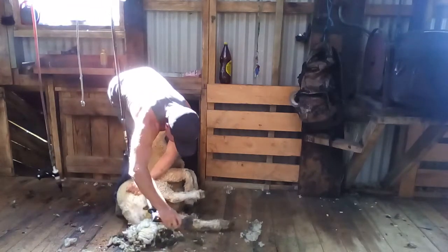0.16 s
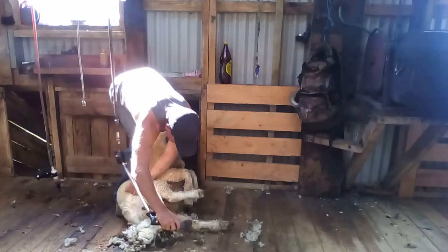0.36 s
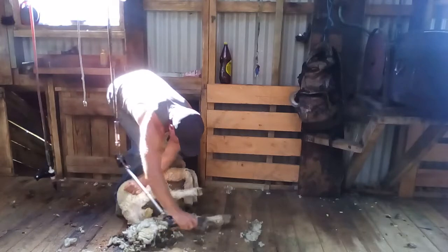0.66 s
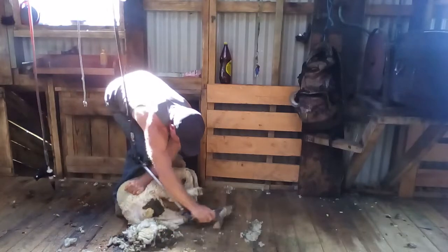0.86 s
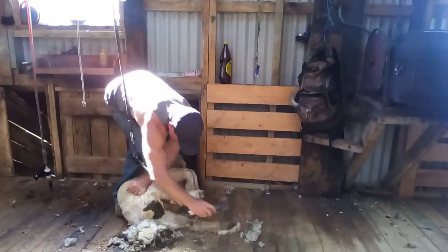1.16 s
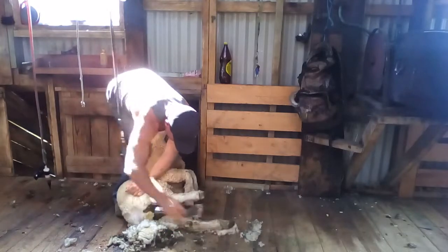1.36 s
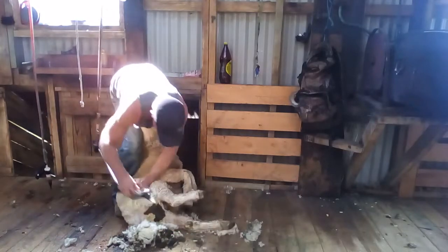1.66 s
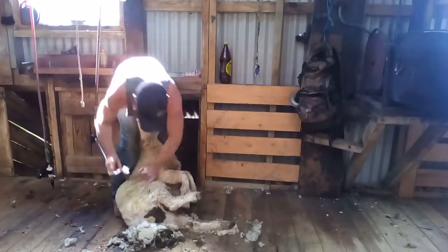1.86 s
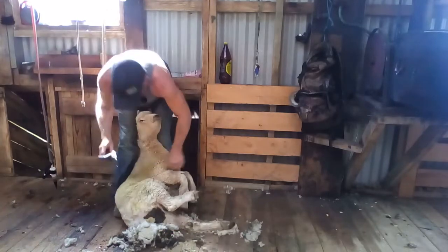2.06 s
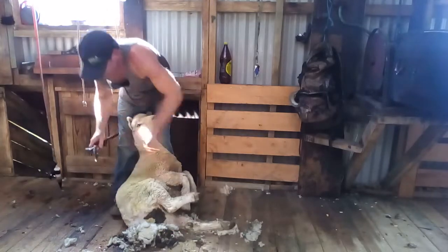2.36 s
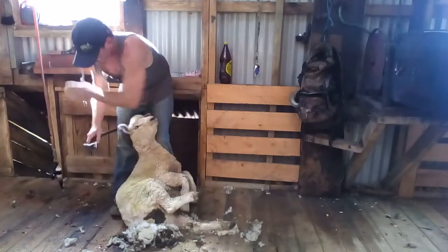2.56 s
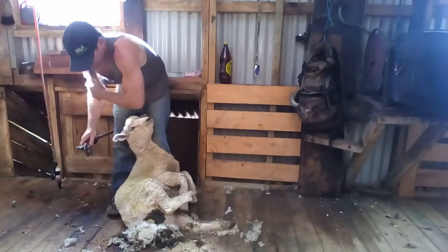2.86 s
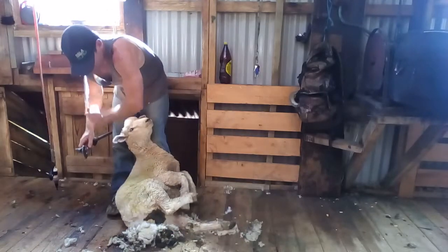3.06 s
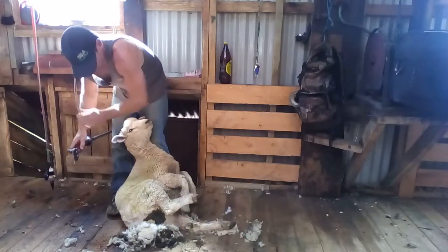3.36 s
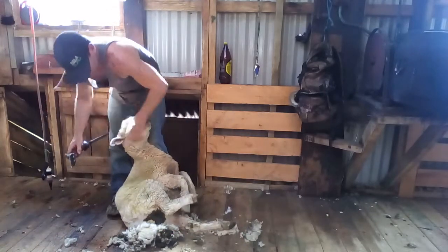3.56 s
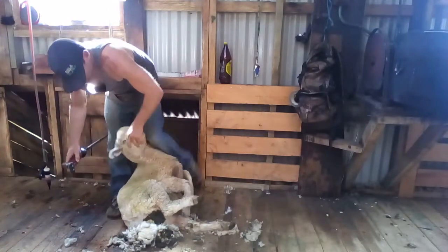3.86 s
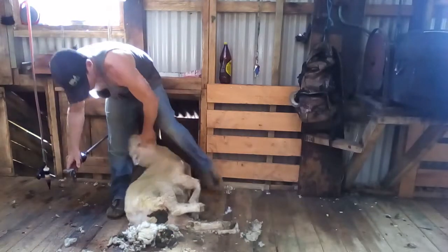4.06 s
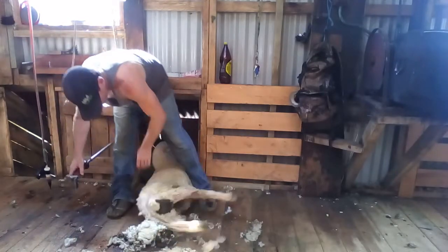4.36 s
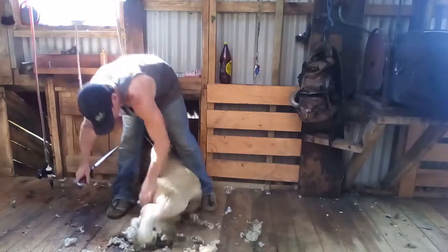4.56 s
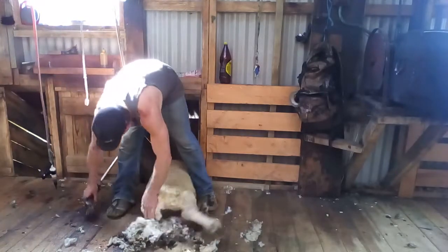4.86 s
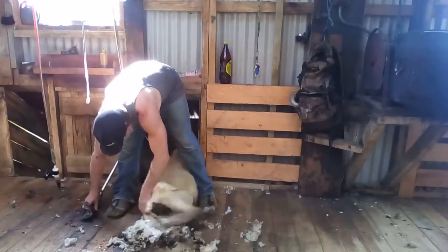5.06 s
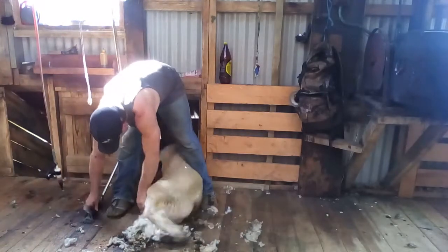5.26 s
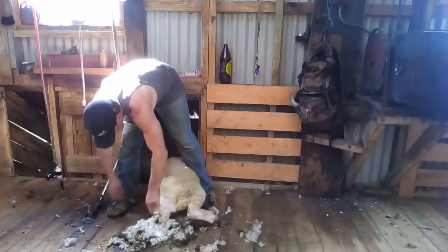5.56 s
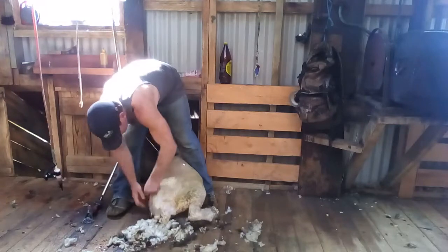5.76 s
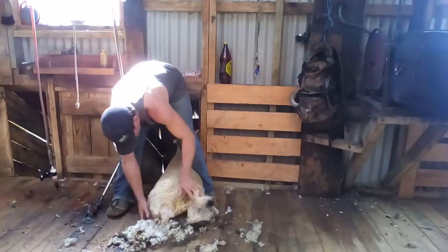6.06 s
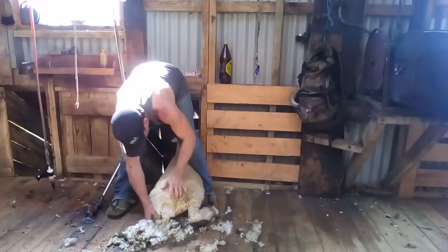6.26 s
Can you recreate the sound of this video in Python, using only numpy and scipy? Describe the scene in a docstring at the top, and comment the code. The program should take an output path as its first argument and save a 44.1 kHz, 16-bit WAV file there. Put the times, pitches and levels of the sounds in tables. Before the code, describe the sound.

Loud continuous buzzing of electric sheep shears, slightly wavering and freer once lifted from the wool, ends abruptly with a hard mechanical clack and rattling rebounds; another clack follows shortly. Only a quiet overhead motor whirr continues, towards the left. Later come brief rubbing slides, hollow knocks on floorboards, a tiny metal clink and soft tumbling thuds, with short shed reverberation around a fixed stereo microphone at moderate distance.

```python
"""Shearing handpiece in a wooden shed

A shaft-driven handpiece trims a sheep: shaft harmonics hum, steel grinds in stereo noise and a wall rattles.
A pull on the cord throws the drive out with a clunk of decaying modes; the lever clacks back, bouncing.
The overhead motor, noise and wavering tones, whirrs throughout. Wool and leather then slide by stick and slip,
a boot knocks on the floorboards, exciting their modes, the handpiece is laid down and the sheep is rolled over.
"""
import sys
import numpy as np
from scipy import signal
from scipy.fft import rfft, irfft, next_fast_len
from scipy.io import wavfile

SR = 44100
rng = np.random.default_rng(int(sys.argv[2]) if len(sys.argv) > 2 else 0)


def put_to_file(sound):
    """Save the sound as 16-bit audio at rate SR, in the file named by the first command-line argument."""
    columns = np.atleast_2d(sound).T  # one column per channel
    safe = np.clip(columns, -1, 1)
    whole_steps = np.round(safe * 32767)
    wavfile.write(sys.argv[1], SR, whole_steps.astype(np.int16))


N = 282681
TIME = np.arange(N) / SR   # s


def from_db(db):
    """Logarithmic level: decibels become an amplitude ratio."""
    return 10 ** (np.asarray(db) / 20)


def rms_one(x):
    """Normalisation: scale to an rms of 1."""
    return x / np.sqrt(np.mean(x ** 2) + 1e-20)


def in_time(rows):
    """Linear interpolation: the columns of a time course at every sample."""
    s, *columns = np.transpose(rows)
    return [np.interp(TIME, s, c) for c in columns]


def at_hz(points, hz):
    """Interpolation of a table on a log-frequency axis."""
    f, value = np.transpose(points)
    return np.interp(np.log(hz + 1), np.log(f), value)


def bins(size):
    """Discrete Fourier transform: its bin frequencies in Hz."""
    return np.fft.rfftfreq(size, 1 / SR)


def drift(rate_hz):
    """Low-pass noise: a smooth random course of rms 1, with a double pole at the given rate."""
    step = 40   # samples between computed points
    r = np.exp(-2 * np.pi * rate_hz * step / SR)
    noise = rng.standard_normal(N // step + 2002)
    slow = signal.lfilter([1], [1, -2 * r, r * r], noise)[2000:]   # the settling is dropped
    return np.interp(np.arange(N) / step, np.arange(len(slow)), rms_one(slow))


def colour(x, spectrum):
    """Minimum-phase filtering: the folded cepstrum of a dB curve gives a causal response."""
    size = 2 * next_fast_len(x.shape[-1] // 2 + SR // 10)
    cepstrum = irfft(np.log(from_db(at_hz(spectrum, bins(size)))))
    cepstrum[1:size // 2] *= 2
    cepstrum[size // 2 + 1:] = 0
    response = np.exp(rfft(cepstrum))
    return irfft(rfft(x, size) * response)[..., :x.shape[-1]]


# correlation of the two channels: f/Hz, likeness/0-1
CHANNEL_LIKENESS = [(250, 0.89), (500, 0.66), (1000, 0.31), (2000, 0), (12000, 0.03)]


def diffuse(size):
    """Diffuse field: stereo white noise, alike in the bass and nearly unrelated in the treble."""
    padded = 2 * next_fast_len(size // 2 + 1)
    mid, side = rfft(rng.standard_normal((2, padded)))
    alike = np.clip(at_hz(CHANNEL_LIKENESS, bins(padded)), 0, 1)
    common = np.sqrt((1 + alike) / 2) * mid
    opposed = np.sqrt((1 - alike) / 2) * side * [[1], [-1]]
    return irfft(common + opposed)[:, :size]


# reverberation time of the shed: f/Hz, t60/s
SHED_T60 = [(100, 0.85), (500, 0.64), (1500, 0.51), (5000, 0.79), (12000, 0.09)]


def shed(x, wet_db, build_s):
    """Reverberation: direct sound, earlier on the left, plus reflections that build up and die band by band."""
    t, centres = TIME[:SR], np.geomspace(60, 15000, num=9)
    noise, tail = rfft(diffuse(SR)), 0
    for hz, own in zip(centres, np.eye(len(centres))):
        band = irfft(noise * at_hz(np.c_[centres, own], bins(SR)), SR)
        tail = tail + band * from_db(-60 * t / at_hz(SHED_T60, hz))
    tail = rms_one(tail * (1 - np.exp(-t / build_s))) / np.sqrt(SR)
    direct = np.array([x, np.roll(x, 3)])
    reflections = signal.fftconvolve(x[None], tail, axes=1)[:, :N]
    return direct + from_db(wet_db) * reflections


def ringing(modes, scatter_db):
    """Modal superposition: one blow gives every mode a strength and sign of its own."""
    hz, db, t60 = np.transpose(modes)[:, :, None]
    t = TIME[:SR // 2]
    strength = from_db(db + scatter_db * rng.standard_normal(hz.shape)) * rng.choice([-1, 1], hz.shape)
    return np.sum(strength * from_db(-60 * t / t60) * np.sin(2 * np.pi * hz * t), axis=0)


def crunch(spectrum, decay_s, spread=0.94):
    """Impulsive contact: one sharp push, then coloured noise for dense, quickly damped modes."""
    t = TIME[:SR // 2]
    force = spread * rng.standard_normal(len(t)) * np.exp(-t / decay_s)
    force[0] += np.sqrt(SR * decay_s) / 2
    return colour(force, spectrum)


def add(track, s, db, cut_hz, sound, order=2):
    """Contact stiffness: lay a blow on a track; a softer contact has a lower cut-off."""
    low_pass = signal.butter(order, min(cut_hz, SR / 3), fs=SR, output="sos")
    soft = signal.sosfilt(low_pass, sound)
    start = int(s * SR)
    track[start:start + len(soft)] += from_db(db) * soft[:N - start]


def grains(spread_db):
    """Shot noise: countless tiny snaps of uneven size, rms 1."""
    size_db = spread_db * np.minimum(rng.exponential(1, N), 5)
    return rms_one(rng.standard_normal(N) * from_db(size_db))


MOVE_ATTACK_S, MOVE_RELEASE_S = 0.014, 0.017


def push(s, length_s):
    """Exponential envelope: one movement of the body swells, holds and dies away."""
    before = np.maximum(s - TIME, 0)
    after = np.maximum(TIME - s - length_s, 0)
    return np.exp(-before / MOVE_ATTACK_S - after / MOVE_RELEASE_S)


STOP_S = 3.135   # the drive is thrown out


def running(fade_s):
    """Exponential decay: 1 while the drive is engaged, then dying away."""
    return np.exp(-np.maximum(TIME - STOP_S, 0) / fade_s)


LIFT_S, LIFT_TAKES_S = 2.033, 0.27


def lifted():
    """Release of load: 0 while the comb is in the wool, rising to 1 once the handpiece hangs free."""
    return np.clip((TIME - LIFT_S) / LIFT_TAKES_S, 0, 1)


# the shaft runs at a nearly constant speed; slack, it speeds up a little
TURNS_PER_S, SPEED_WANDER_PER_S, FREE_GAIN_TURNS_PER_S = 60.3, .07, .15


def shaft_turns(free):
    """Phase as the integral of speed: turns of the drive shaft since the start."""
    speed = TURNS_PER_S + FREE_GAIN_TURNS_PER_S * free + SPEED_WANDER_PER_S * drift(1.09)
    return np.cumsum(speed) / SR


# main hum, the seventh shaft order: t/s, level/dB
HUM_LEVEL = [(0.04, -19), (0.12, -17.5), (0.35, -21.5), (0.62, -17.5), (1.0, -18.5), (1.1, -22.5),
             (1.18, -18), (1.53, -21), (2.06, -14), (2.17, -21), (2.51, -23.5), (2.54, -16.5), (2.82, -34),
             (2.86, -25), (3.03, -23.5), (3.11, -19.5)]
HUM_ORDER = 7
# how far the arm stretches the jointed drive tube: t/s, reach/0-1
TUBE_REACH = [(.48, 0), (.7, 1), (.98, 0.82), (1.15, 0.48), (1.5, 0), (1.9, 0.6), (2.3, 0.22)]
# other orders: multiple, level while cutting/dB, change at full reach/dB, change when hanging free/dB
OTHER_ORDERS = [(1, -41.5, -0.5, -5), (2, -31.5, -8.5, 2), (3, -33, -10, 2), (4, -26.5, 2.5, -2.5),
                (5, -36.5, -6.5, 0.5), (6, -43, 10, -10), (8, -33.5, -0.5, -3.5), (9, -49, -8, 17.5),
                (10, -40.5, 6, 2), (11, -32, -9, -4.5), (13, -48, -4, 6), (14, -40.5, -11, 5.5),
                (15, -50.5, 15, 4), (17, -47.5, -2, 0), (20, -49, 0, -10), (27, -48, 0, -2)]
# depth (0-1) of the main hum's slow waver and quick flutter; the slack shaft swings more
SWING_CUTTING, SWING_FREE = 0.031, 0.31
SHAKE_CUTTING, SHAKE_FREE = 0.084, 0.22


def shaft_tone(turns, multiple, db, depth, flutter):
    """Modulated harmonic: one multiple of the shaft speed, wavering in level and phase."""
    wobble = (1 + depth * (drift(1.9) + 1j * drift(2.2))) / np.sqrt(1 + 2 * depth ** 2)
    wobble = wobble + flutter * (drift(29) + 1j * drift(17))
    carrier = np.exp(2j * np.pi * (multiple * turns + rng.random()))
    return np.sqrt(2) * from_db(db) * np.real(wobble * carrier)


def drive_hum(turns, weak_waver=0.13, weak_flutter=0.037):
    """Harmonic series of a rotating shaft: orders waver as the tube swings and rebalance as it stretches."""
    free, reach = lifted(), in_time(TUBE_REACH)[0]
    swing = SWING_CUTTING + (SWING_FREE - SWING_CUTTING) * free
    shake = SHAKE_CUTTING + (SHAKE_FREE - SHAKE_CUTTING) * free
    hum = shaft_tone(turns, HUM_ORDER, in_time(HUM_LEVEL)[0], swing, shake)
    for multiple, db, reach_db, free_db in OTHER_ORDERS:
        level_db = db + reach_db * reach + free_db * free
        hum = hum + shaft_tone(turns, round(multiple), level_db, weak_waver, weak_flutter)
    return hum * running(0.0021) * from_db([[-.4], [.4]])


def steel_ring(friction, course, width_hz, shimmer_db):
    """Resonance under friction: a steel part rings unevenly, at a slowly gliding pitch."""
    hz, ring_db = in_time(course)
    carrier = np.exp(2j * np.pi * np.cumsum(hz) / SR)
    r = np.exp(-np.pi * width_hz / SR)
    drive = friction * from_db(ring_db + shimmer_db * drift(104))
    return np.real(carrier * signal.lfilter([1 - r], [1, -r], drive / carrier))


# colour of the cutter: f/Hz, filter gain/dB
CUTTER_COLOUR = [(900, -10), (1300, -6.5), (1600, -4.5), (2050, -4.5), (2500, -2.5), (3700, -4),
                 (4800, -0.5), (5400, -3), (6200, -3.5), (7100, -10.5), (8300, -19.5), (12200, -42.5),
                 (12900, -15.5), (15200, -28)]
# left minus right of the cutter: f/Hz, difference/dB
CUTTER_BALANCE = [(1000, 2.5), (1700, -0.5), (2400, 5.5), (4300, 4.5), (4900, -0.5), (6100, -8), (7300, -9),
                  (8500, 2), (11000, 21.5), (13000, -0.5)]
# comb teeth catching: t/s, relative level/dB
TOOTH_SNAGS = [(.977, -39), (1.864, -28), (2.11, -26), (2.874, -18.5)]
# the fork rings higher as the comb is pushed out along the leg, and lower once free: t/s, f/Hz, ring/dB
FORK_RING = [(.1, 2480, -4), (.35, 2600, -8), (.55, 2800, -9), (.9, 2570, -10), (1.15, 2650, 2),
             (1.42, 2950, 2), (1.7, 2850, -11), (2.05, 2450, -22), (2.22, 2420, -5.5), (3.1, 2380, -13)]
# the comb's resonance shifts with the pressure on it: t/s, f/Hz, ring/dB
COMB_RING = [(.05, 4930, 6), (.25, 4850, -18), (.55, 4950, -5), (.8, 4950, 1), (1.0, 4750, -1),
             (1.25, 4880, 0), (1.5, 4750, -10), (1.65, 4640, -3), (2.15, 4440, 6.5), (2.3, 4750, 3),
             (2.7, 4850, -2), (3.1, 4900, -2)]
# the teeth ring where the wool leaves them bare: t/s, f/Hz, ring/dB
TEETH_RING = [(.05, 6100, 4.5), (.25, 6050, -25), (.68, 5900, 5), (1.0, 5900, -21), (1.22, 6100, 7),
              (1.45, 6100, -9), (2.2, 5870, 1), (2.5, 6000, -5), (3.1, 5900, -3)]
# the shearer eases off between strokes: t/s, length/s, change of the friction/dB
STROKE_EASES = [(0.213, 0.2, 0), (1.546, 0.42, -.5)]
FRICTION_DB, FRICTION_FREE_DB = -26, 0.2   # before wash, rings, colour and gain; louder with no wool to damp it
SLAP, SLAP_SHARPNESS, SLAP_LOPSIDED_DB = 1.5, 6, 2


def cutter(turns, uneven_db=2.5, bite_db=0.5, linger_s=0.016):
    """Dry friction: the cutter grinds over the comb and slaps at both stroke ends, harder at one; fibres snap."""
    stroke = (2 * turns).astype(int)   # two strokes a turn
    force = from_db(uneven_db * rng.standard_normal(N)[stroke] + SLAP_LOPSIDED_DB * (-1) ** stroke)
    slaps = force * np.exp(-SLAP_SHARPNESS * (2 * turns % 1))
    level_db = FRICTION_DB + FRICTION_FREE_DB * lifted()
    for s, length_s, change_db in STROKE_EASES:
        level_db = level_db + change_db * push(s, length_s)
    bite = from_db(level_db + bite_db * drift(9.7)) * running(0.0066)
    friction = rms_one(grains(spread_db=4.5) * (1 + SLAP * slaps)) * bite
    for s, db in TOOTH_SNAGS:
        add(friction, s, db, 14000, crunch([(1000, -26), (5000, -9.0), (14000, 14.0)], 0.0018))

    # the hand keeps moving, so the reflections blur into a wash that trails the cutter's power
    r = np.exp(-1 / (linger_s * SR))
    wash = diffuse(N) * np.sqrt(signal.lfilter([1 - r], [1, -r], friction ** 2))
    heard = np.array([friction, np.roll(friction, 3)]) + from_db(3.0) * wash
    rings = steel_ring(heard, FORK_RING, width_hz=420, shimmer_db=1.5)
    rings = rings + steel_ring(heard, COMB_RING, width_hz=300, shimmer_db=4.5)
    rings = rings + steel_ring(heard, TEETH_RING, width_hz=490, shimmer_db=3.0)

    left, right = colour(heard + rings, CUTTER_COLOUR)
    half_side = np.array(CUTTER_BALANCE) * [1, .5]   # each channel takes half the difference
    return from_db(5.0) * np.array([colour(left, half_side), colour(right, half_side * [1, -1])])


# colour of the rattling shaft and wall: f/Hz, filter gain/dB
RATTLE_COLOUR = [(25, -0.5), (40, -25), (85, -8.5), (135, -1.5), (156, 8.5), (175, -3.5), (215, 0),
                 (330, -1), (430, 7.5), (510, 0.5), (600, 0.5), (720, -4), (850, -1.5), (1100, -9),
                 (1600, -8.5), (2600, -29)]
RATTLE_CUTTING_DB, RATTLE_FREE_DB = -27, -25.5


def shaft_rattle(turns, throb=0.12, flutter_db=2.0):
    """Amplitude-modulated noise: loose joints in the drive tube shake the wall, harder once a turn."""
    level_db = RATTLE_CUTTING_DB + (RATTLE_FREE_DB - RATTLE_CUTTING_DB) * lifted()
    shake = (1 + throb * np.cos(2 * np.pi * turns)) * from_db(flutter_db * drift(32))
    return from_db(level_db) * rms_one(colour(diffuse(N) * shake, RATTLE_COLOUR)) * running(0.085)


# colour of the motor's whirr: f/Hz, filter gain/dB
WHIRR_COLOUR = [(25, -15), (42, -20), (62, -2.5), (150, -5.5), (260, -7), (410, -9.5), (590, -7),
                (1000, -13), (1900, -15), (3100, -14.5), (3800, -21), (6400, -21), (7800, -47.5),
                (13000, -55)]
# tones of the motor: f/Hz, level/dB
MOTOR_TONES = [(64.6, -58), (107.6, -64), (150.7, -61.5), (193.8, -55.5), (215.3, -57.5), (258.4, -54.5),
               (301.4, -60), (344.5, -57.5), (500.6, -56.5), (549.1, -59), (576, -54), (597.5, -57),
               (619.1, -60.5), (662.1, -60), (694, -65.5)]
WHIRR_DB = -43
TONE_WAVER, TONE_PHASE_WANDER_RAD = .2, .35


def idling_motor():
    """Interaural delay: the overhead motor, far to the left, whirrs softly under gently wavering tones."""
    tones = 0
    for hz, db in MOTOR_TONES:
        phase = 2 * np.pi * (hz * TIME + rng.random()) + TONE_PHASE_WANDER_RAD * drift(2.2)
        tones = tones + np.sqrt(2) * from_db(db) * (1 + TONE_WAVER * drift(1)) * np.sin(phase)
    direct = rng.standard_normal(N)
    air = from_db(-5.0) * np.array([direct, np.roll(direct, 18)]) + diffuse(N)   # right lags by 0.4 ms
    whirr = rms_one(colour(air, WHIRR_COLOUR))
    return (from_db(WHIRR_DB) * whirr + tones) * from_db([[.4], [-.4]])


# the lever is thrown and springs back: t/s, level/dB, contact cut-off f/Hz, relative housing ring/dB
LEVER_THROWS = [(3.1650, -0.5, 3630, -1.5), (3.4880, -2.5, 2330, 1)]
# it rebounds on the housing: t/s, level/dB
LEVER_REBOUNDS = [(3.194, -6.5), (3.232, -8.5), (3.258, -3), (3.517, -12), (3.546, -15), (3.572, -11.5),
                  (3.583, -22), (3.6, -27)]
REBOUND_CUT_HZ = 2060
# each move glances at first touch, then lands in a quick chatter
GLANCE_DB, CHATTER_S, CHATTER_LOSS_DB = -8, .0032, 1.3


def lever_contacts(chatter_count=4):
    """Repeated impact: a glance and an uneven chatter for each move, and the rebounds."""
    contacts = [(s, db, REBOUND_CUT_HZ, 0) for s, db in LEVER_REBOUNDS]
    for s, db, cut_hz, ring_db in LEVER_THROWS:
        gaps = CHATTER_S * rng.uniform(.65, 1.35, chatter_count - 1)
        contacts.append((s, db + GLANCE_DB, cut_hz, ring_db))
        for k, t in enumerate(s + np.cumsum(gaps)):
            contacts.append((t, db - k * CHATTER_LOSS_DB, cut_hz, ring_db))
    return contacts


# modes of the drive housing and its wall: f/Hz, relative level/dB, t60/s
HOUSING_MODES = [(92, -21, .38), (165, -15, 0.33), (247.5, -8, .38), (483, 0, 0.11), (566, -0.5, 0.073),
                 (690, -5, .12), (760, 2, .07), (860, 8, 0.052), (956, 10.5, 0.025), (1120, 3, .025),
                 (1250, -3, 0.021), (1510, 1, .028), (1626, 6, 0.033), (1803, 6, 0.024), (2300, -1, .04)]
# colour of its short crack: f/Hz, filter gain/dB
CRACK_COLOUR = [(45, -27), (90, 2.5), (400, -3.5), (800, 6.5), (1200, -2.5), (1700, -0.5), (2000, -6),
                (2400, -6.5), (2800, -12), (4200, -7.5), (6400, 1.5), (8000, -23), (14000, -20)]
# colour of the lever's rasp off its catch: f/Hz, filter gain/dB
CATCH_COLOUR = [(400, -4), (2500, -6), (4300, 2), (6500, 3), (8000, -23), (14000, -25)]
CATCH_S, CATCH_TAKES_S, CATCH_DB = 3.463, 0.017, -28   # just before the lever springs back


def clutch():
    """Impact excitation of modes: the lever slams over, later rasps off its catch and springs back, bouncing."""
    slipping = np.sin(np.pi * np.clip((TIME - CATCH_S) / CATCH_TAKES_S, 0, 1))
    out = from_db(CATCH_DB) * slipping * rms_one(colour(rng.standard_normal(N), CATCH_COLOUR))
    for s, db, cut_hz, ring_db in lever_contacts():
        ring = from_db(ring_db - 27) * ringing(HOUSING_MODES, scatter_db=1.5)
        crack = from_db(-7.5) * crunch(CRACK_COLOUR, 0.0048, spread=2.44)
        add(out, s, db, cut_hz, ring + crack)
    return shed(out, wet_db=-2.0, build_s=0.0083)


SLIPS_PER_S, SLIP_DECAY_S, SLIP_DEPTH = 86, 0.0046, 1.2   # rate and decay wander together


def slips():
    """Stick and slip: the force jerks at every release and the jerk dies quickly."""
    travel = np.cumsum(SLIPS_PER_S * from_db(3.3 * drift(30))) / SR
    return rms_one(1 + SLIP_DEPTH * np.exp(-(travel % 1) / (SLIPS_PER_S * SLIP_DECAY_S)))


# the boot scuffs and the sheep slides: t/s, length/s, rubbing level/dB, weight rumble level/dB
BODY_SLIDES = [(3.54, 0.26, -57, -43), (4.663, 0.039, -39.5, -39), (4.717, 0.091, -31, -40),
               (5.013, 0.032, -64, -35.5), (5.313, 0.036, -38.5, -31.5), (5.415, 0.078, -30, -39),
               (5.515, 0.052, -39, -27), (5.98, 0.022, -44, -43)]
# colour of the rubbing: f/Hz, filter gain/dB
RUB_COLOUR = [(100, -3), (300, 10.5), (550, -0.5), (900, -1.5), (1700, -10.5), (2200, -16.5), (3200, -20),
              (6500, -41), (8000, -71), (14000, -86)]
# colour of the rumble: f/Hz, filter gain/dB
RUMBLE_COLOUR = [(25, -31), (60, -3.5), (100, 1.5), (140, -2), (300, -28), (1000, -74)]


def sliding():
    """Stick-slip friction: wool and boot leather jerk over the grain while shifting weight rumbles the floor."""
    rubbing, weight = np.zeros(N), np.zeros(N)
    for s, length_s, rub_db, rumble_db in BODY_SLIDES:
        movement = push(s, length_s)
        rubbing += from_db(rub_db) * movement
        weight += from_db(rumble_db) * movement
    jerks = slips()
    rub = rubbing * rms_one(colour(grains(spread_db=2.0) * jerks, RUB_COLOUR))
    rumble = weight * rms_one(colour(rng.standard_normal(N) * jerks, RUMBLE_COLOUR))
    return shed(rub, wet_db=-8.0, build_s=0.0036) + rumble


# modes of the floorboards: f/Hz, relative level/dB, t60/s
BOARD_MODES = [(209.5, -10, 0.42), (269, -3.5, 0.13), (300, -19.5, 0.2), (349.6, -9, 0.19),
               (400, -11, 0.15), (481, -9, 0.18), (525, -3.5, 0.087), (640, -3.5, 0.052), (800, -7, 0.023),
               (1040, 2, 0.025), (1260, -4, 0.027), (1440, -1, 0.025), (1606, 7, 0.013), (1740, -5, 0.014),
               (2410, -10, 0.033)]
# colour of the thud: f/Hz, filter gain/dB
THUD_COLOUR = [(40, -10), (100, -7), (300, 5), (600, -1.5), (850, -6), (1600, -8.5), (1950, -19),
               (6500, -22.5), (9000, -36)]


def board_blow():
    """Plate vibration: the board modes ring under a dull, quickly damped thud."""
    thud = crunch(THUD_COLOUR, 0.0077, spread=0.99)
    return from_db(-17.0) * ringing(BOARD_MODES, scatter_db=1.0) + from_db(1.0) * thud


# modes of the joists: f/Hz, relative level/dB, t60/s
JOIST_MODES = [(62, -41, .2), (93.5, -31.5, 0.24), (138.2, -21.5, 0.28), (160, -31, 0.21)]
BOOM_HIGH_PASS_HZ = 85   # the joist boom carries little below this


def joist_boom():
    """High-pass filtering: the weight of a step sets the joists swinging, with little sound below the cut-off."""
    high_pass = signal.butter(2, BOOM_HIGH_PASS_HZ, "high", fs=SR, output="sos")
    return signal.sosfilt(high_pass, ringing(JOIST_MODES, 0))


# knocks: t/s, level/dB, contact cut-off f/Hz, relative joist boom/dB, relative loose-board ring/dB
FLOOR_KNOCKS = [(4.7033, -11, 6000, 18, 12), (4.717, -11, 5000, -13, -10), (4.8498, -3.5, 2200, 5, -20),
                (5.341, -1.5, 555, -16, -15), (5.371, -7, 378, -15, -9), (5.392, -3.5, 580, -15, -20),
                (5.423, -6, 530, -17, -19), (5.43, -11, 450, -18, -13), (5.51, -9.5, 326, -4, -10),
                (5.521, -23, 2000, -20, -20), (5.549, -21, 280, -7, -8), (5.574, -21.5, 2200, -17, -18),
                (5.586, -14, 160, 0, -20), (5.684, -23.5, 3500, -22, -20)]
# modes of a loose board: f/Hz, relative level/dB, t60/s
LOOSE_BOARD_MODES = [(256, 0.5, 0.12), (594, 6.5, 0.054), (683, -18, 0.4), (1310, 0, 0.048),
                     (1470, -15, .03), (2430, -14, .03)]
# the steel handpiece is laid down: t/s, level/dB, contact cut-off f/Hz
HANDPIECE_CONTACTS = [(5.297, -20.5, 11800), (5.304, -26, 1990), (5.314, -28, 10000)]
# colour of its clink: f/Hz, filter gain/dB
CLINK_COLOUR = [(300, 7), (1600, -6), (2500, -19), (6000, -4.5), (9000, -25), (14000, -36)]
# heel, then sole: every knock settles with a weaker contact, and its weight reaches the joists
SETTLE_S, SETTLE_DB = 0.018, -11.5


def floor_knocks():
    """Coupled structures: boots, hooves, sheep and handpiece strike the boards; heavy steps boom the joists."""
    out = np.zeros(N)
    for s, db, cut_hz, boom_db, loose_db in FLOOR_KNOCKS:
        first = board_blow() + from_db(loose_db - 18) * ringing(LOOSE_BOARD_MODES, 0)
        settling = from_db(SETTLE_DB) * board_blow() + from_db(boom_db) * joist_boom()
        add(out, s, db, cut_hz, first, order=3)
        add(out, s + SETTLE_S, db, cut_hz, settling, order=3)
    for s, db, cut_hz in HANDPIECE_CONTACTS:
        add(out, s, db, cut_hz, crunch(CLINK_COLOUR, 0.0044))
    return shed(out, wet_db=-7.0, build_s=0.0038) * from_db([[.4], [-.4]])


def scene():
    """Superposition: one shaft drives hum, cutter and rattle; motor, clutch and floor add to them."""
    turns = shaft_turns(lifted())
    machine = drive_hum(turns) + cutter(turns) + shaft_rattle(turns)
    return machine + idling_motor() + clutch() + sliding() + floor_knocks()


CUTOFF_HZ = 15500


def record(dry):
    """Soft saturation and band limiting: peaks are rounded and the top is cut."""
    rounded = .95 * np.tanh(dry / .95)
    low_pass = signal.ellip(10, .1, 80, CUTOFF_HZ, fs=SR, output="sos")
    return signal.sosfilt(low_pass, rounded)


dry = scene()
out = record(dry)
put_to_file(out)
```